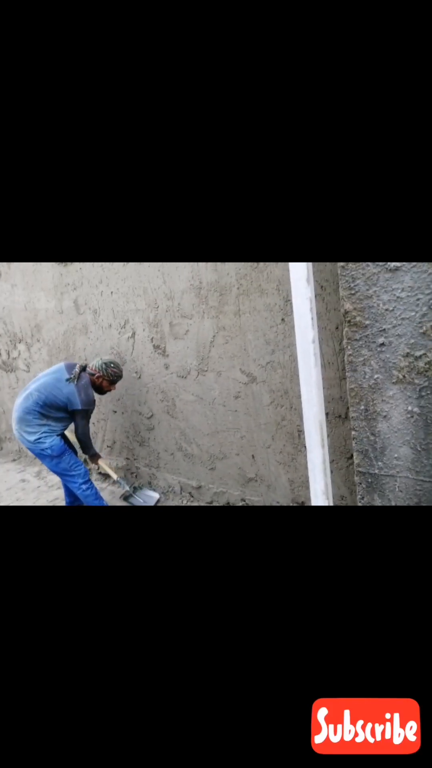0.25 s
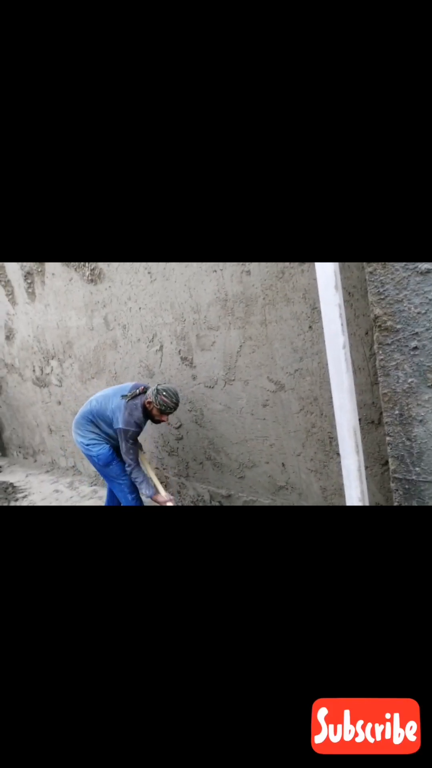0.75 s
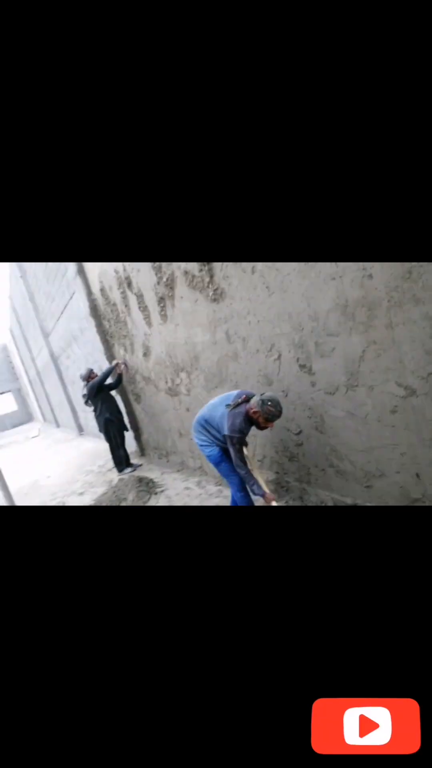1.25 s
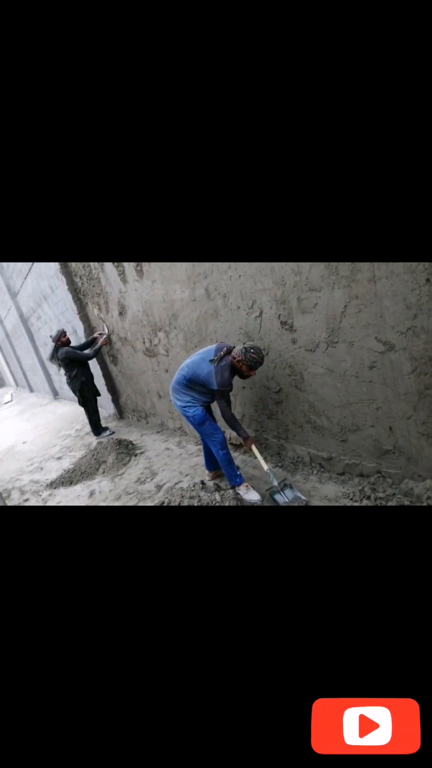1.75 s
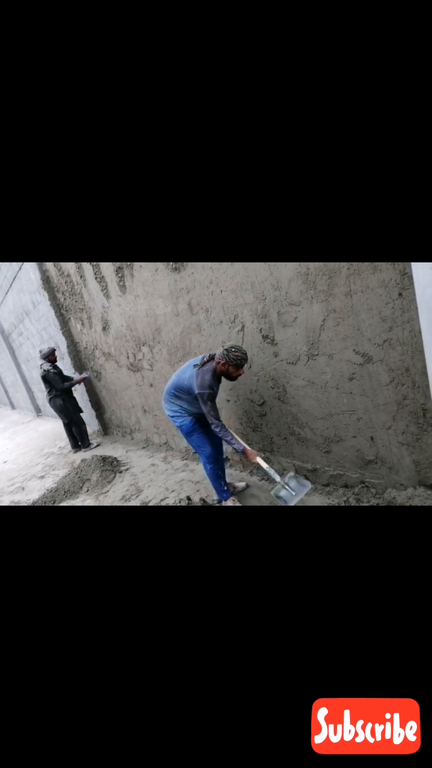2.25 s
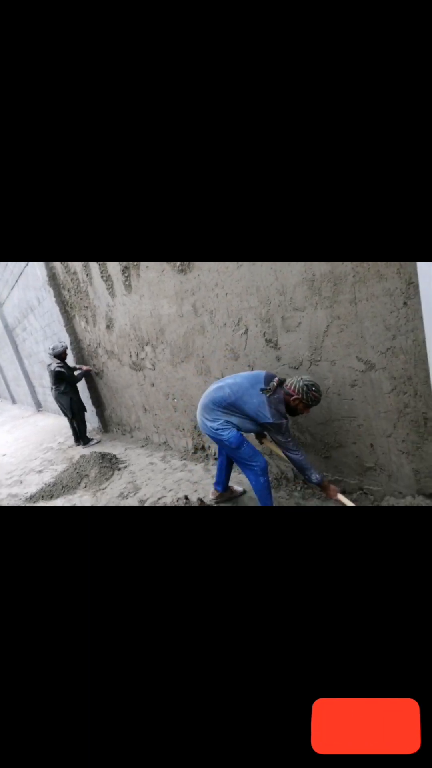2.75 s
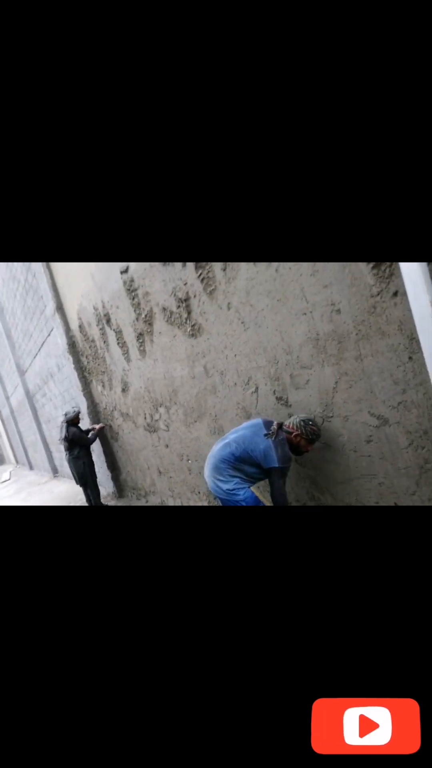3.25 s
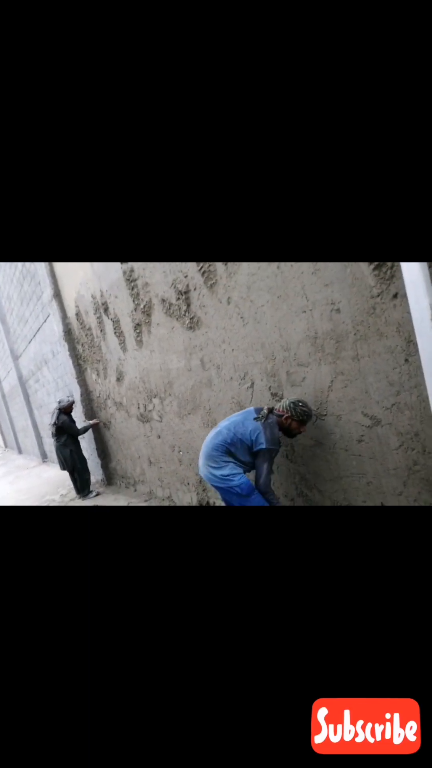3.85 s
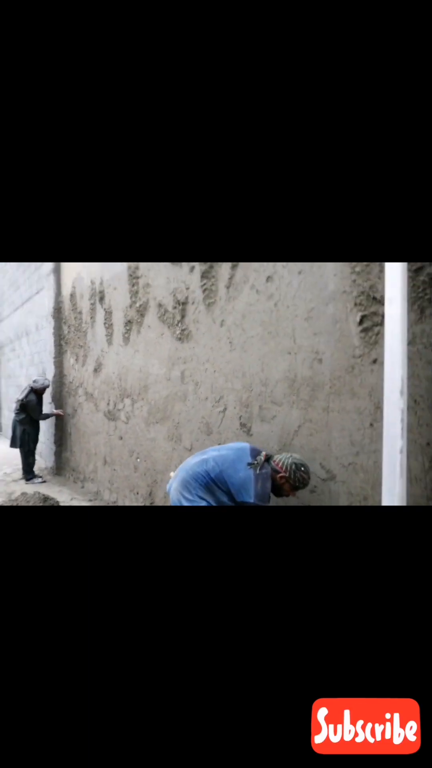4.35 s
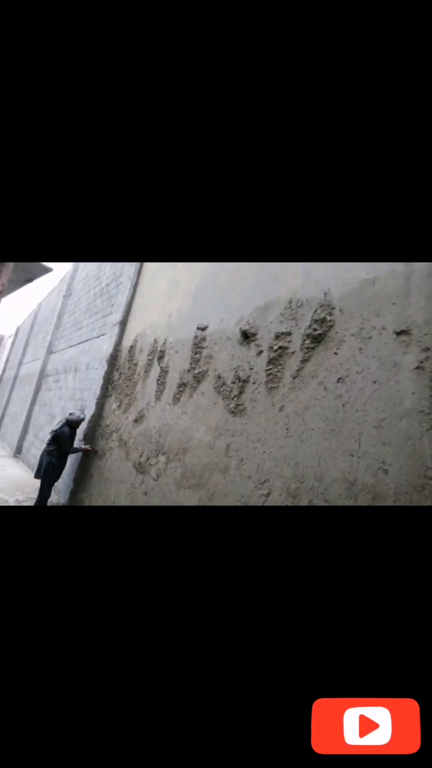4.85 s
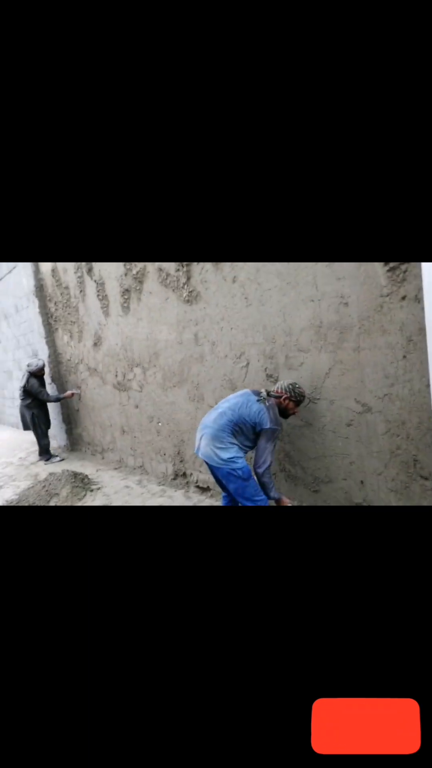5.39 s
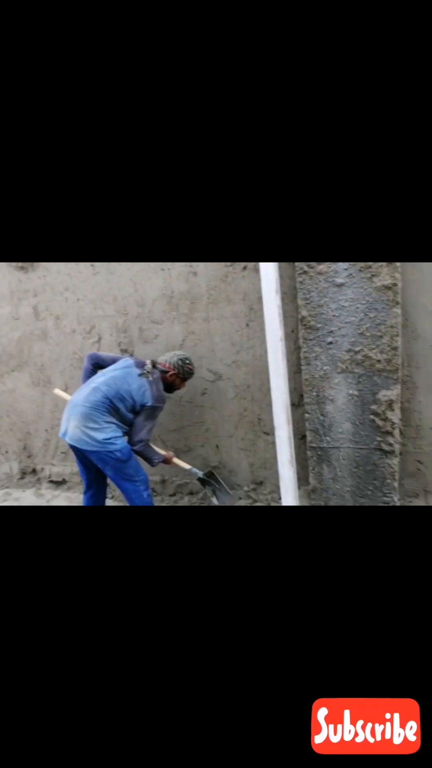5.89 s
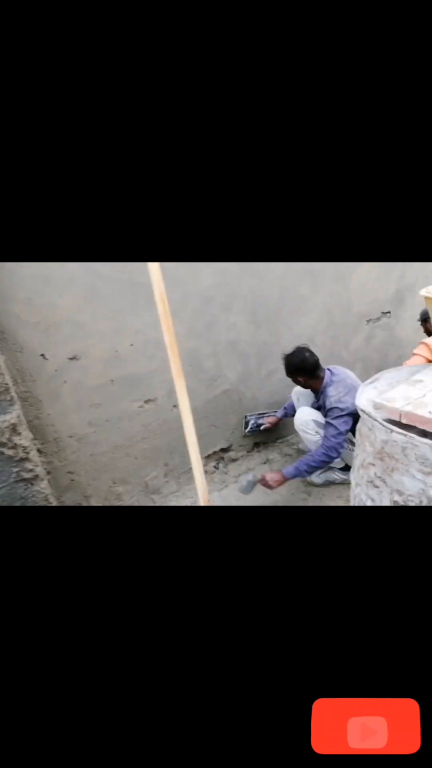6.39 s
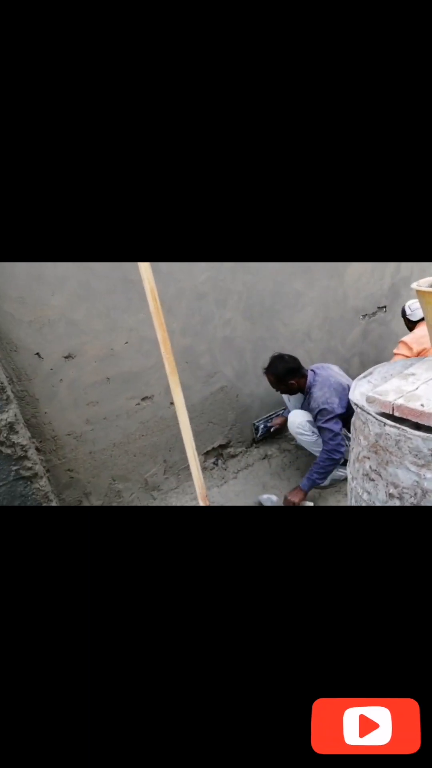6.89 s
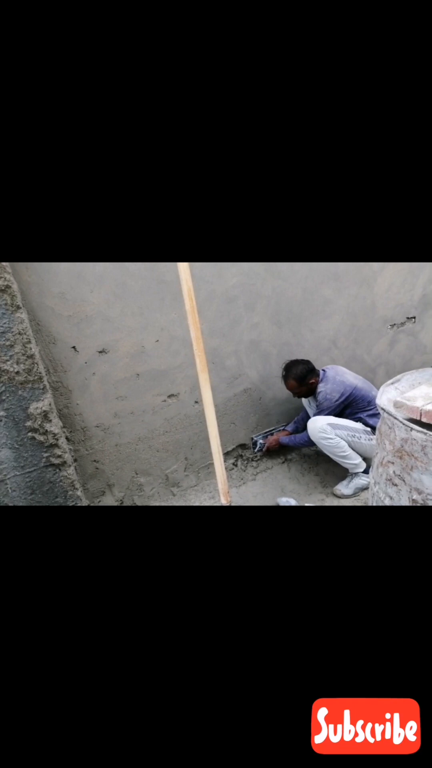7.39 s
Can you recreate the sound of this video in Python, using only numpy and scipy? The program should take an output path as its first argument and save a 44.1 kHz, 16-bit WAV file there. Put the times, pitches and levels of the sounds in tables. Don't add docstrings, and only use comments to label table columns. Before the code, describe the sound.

Outdoors beside a wall, a nearby steel shovel makes short, harsh, gritty scrapes, its plate ringing briefly as it catches lumps, with sand hissing under it. Low wind gusts buffet a hand-held phone's two ports separately, heaviest in the first three seconds, easing midway and returning near the end. Further off a float rubs wet plaster in patchy hisses.

```python
import sys
import numpy as np
from scipy import signal
from scipy.io import wavfile
from scipy.ndimage import uniform_filter1d

SR = 44100
rng = np.random.default_rng(int(sys.argv[2]) if len(sys.argv) > 2 else 0)


def wav_out(sig):
    wavfile.write(sys.argv[1], SR, np.round(np.clip(np.atleast_2d(sig).T, -1, 1) * 32767).astype(np.int16))


def to_linear_factor(level_db):
    exponent = np.asarray(level_db, float) / 20
    return 10 ** exponent


N = 336552


def rms(x):
    return np.sqrt(np.mean(x ** 2) + 1e-20)


def unit(x):
    return x / rms(x)


def power(levels_db):
    return np.sum(to_linear_factor(2 * levels_db), axis=0) + 1e-20


def in_time(rows):
    s, *columns = np.transpose(rows)
    return [np.interp(np.arange(N) / SR, s, c) for c in columns]


def spread_out(coarse):
    return np.interp(np.arange(N) / 32, np.arange(len(coarse)), coarse)


def band(x, low_hz, high_hz, order=2):
    sos = signal.butter(order, [low_hz, min(high_hz, .45 * SR)], "band", fs=SR, output="sos")
    return signal.sosfilt(sos, x)


def drift(rate_hz):
    r = np.exp(-64 * np.pi * rate_hz / SR)
    noise = rng.standard_normal(N // 32 + 3002)
    return unit(signal.lfilter([1], [1, -2 * r, r * r], noise)[3000:])


def grains(per_s, spread_db):
    sizes = to_linear_factor(spread_db * np.minimum(rng.exponential(1, N), 5)) * rng.choice([-1, 1], N)
    return unit(sizes * (rng.random(N) < per_s / SR) + 1e-9)


def ring(x, hz, t60_s):
    r = to_linear_factor(-60 / (t60_s * SR))
    w = 2 * np.pi * hz / SR
    return signal.lfilter([0, np.sin(w)], [1, -2 * r * np.cos(w), r * r], x + 1e-18)


def swell(start_s, hold_s, rise, fall, gained_db=0):
    t = np.arange(N // 32 + 2) * 32 / SR - np.asarray(start_s)[:, None]
    hold_s, rise, fall, gained_db = (np.reshape(v, (-1, 1)) for v in (hold_s, rise, fall, gained_db))
    rising_db = np.minimum(t, 0) / np.maximum(rise, 1e-5)
    falling_db = np.maximum(t - hold_s, 0) / np.maximum(fall, 1e-5)
    return rising_db - falling_db + gained_db * np.clip(t / np.maximum(hold_s, 1e-5), 0, 1)


def evened(x, span_s, share):
    slow = uniform_filter1d(x ** 2, size=round(span_s * SR)) + 1e-3 * np.mean(x ** 2)
    return unit(x / slow ** (np.clip(share, 0, 1) / 2))


def site():
    common, own = rng.standard_normal(N), rng.standard_normal((2, N))
    level = spread_out(to_linear_factor(-62 + 0.5 * drift(26.0)))
    return level * unit(band(common + 1.53 * own, 260, 690, order=1))


def rumble():
    return to_linear_factor(-65) * unit(band(rng.standard_normal((2, N)), 16, 55))


# t/s, level/dB
BREEZE = [(0, -50), (.3, -48), (.5, -31.5), (1.04, -34), (1.1, -56), (1.4, -38.5), (1.53, -49), (1.9, -40),
          (2.6, -38), (2.7, -47), (3.3, -53), (3.9, -52.5), (4.45, -61.5), (4.9, -63), (5.1, -39),
          (5.9, -44.5), (6.4, -64.5), (6.82, -56.5)]
# start t/s, hold/s, level/dB, left minus right/dB
GUSTS = [(0.1, 0.14, -44, -7.5), (0.434, 0.03, -27, -12), (0.584, 0.1, -28, 4.5), (0.75, 0.052, -30, -7),
         (0.876, 0.055, -24, -5.5), (0.986, 0.05, -23.5, -7.5), (1.194, 0.13, -25, -8.5),
         (1.445, 0.0084, -28, 8.5), (1.588, 0.12, -33.5, 1.5), (1.686, 0.046, -31, -10.5),
         (2.004, 0.045, -25.5, 4.5), (2.103, 0.01, -28, 24), (2.262, 0.0082, -24.5, 10.5),
         (2.36, 0.025, -25, 11), (2.451, 0.01, -28.5, -11), (2.54, 0.052, -25.5, 16),
         (2.799, 0.074, -32, 2), (2.923, 0.099, -36, 7), (3.044, 0.039, -34.5, 20), (3.24, 0.012, -40, -10),
         (5.822, 0.063, -41, 3), (5.433, 0.028, -32, 20), (5.504, 0.04, -33, 18), (0.674, 0.031, -27, 2),
         (3.746, 0.079, -55, 3), (3.984, 0.021, -48.5, -2.5), (6.1, 0.15, -65, 0), (3.175, 0.058, -40.5, 1),
         (3.582, 0.018, -39, 6), (4.637, 0.059, -43, -4), (5.059, 0.018, -36.5, -30.5),
         (5.156, 0.046, -32.5, 14.5), (5.326, 0.014, -32.5, 13), (5.604, .1, -40.5, 10),
         (2.468, 0.12, -31.5, 8), (5.699, 0.058, -37.5, 23.5), (6.87, 0.025, -37.5, 1),
         (7.346, 0.013, -28.5, 2), (6.91, 0.049, -29.5, 8.5), (6.986, .22, -30.5, -5),
         (7.28, 0.13, -33.5, -17), (7.421, 0.072, -29, -4), (7.545, 0.092, -36.5, -2.5)]
GUST_RISE_S, GUST_FALL_S = 0.069, 0.07


def gust_levels():
    s, hold_s, level_db, pan_db = np.transpose(GUSTS)
    gusts = to_linear_factor(2 * (level_db[:, None] + swell(s, hold_s, GUST_RISE_S / 20, GUST_FALL_S / 20)))
    total = spread_out(gusts.sum(axis=0)) + to_linear_factor(2 * in_time(BREEZE)[0])
    return 10 * np.log10(total), spread_out(pan_db @ gusts) / total


def wind():
    level_db, pan_db = gust_levels()
    out = []
    for side in (1, -1):
        lumps_db = spread_out(0.91 * drift(12.7) + 2.22 * drift(33.7))
        gust_db = level_db + side * pan_db / 2 + 3.5 - np.abs(pan_db) / 5 + lumps_db
        calm_db = uniform_filter1d(gust_db, size=SR // 12)
        eddies = grains(110, spread_db=4.0)
        swirl = band(grains(500, spread_db=4.0) + 0.34 * eddies, 57.6, 146, order=1)
        swirl = band(swirl, 38.7, 214.4)
        sway = band(rng.standard_normal(N), 18.3, 70.4)
        flap = band(band(eddies, 90.0, 247), 47, 484)
        many = np.roll(eddies, SR) + np.roll(eddies, 2 * SR) + np.roll(eddies, -SR)
        roll = band(band(many, 143, 374), 100, 600)
        snap = band(band(eddies ** 3, 220, 680), 211, 830)
        edge = to_linear_factor(np.clip(1.1 * (gust_db + 25), -15, 4))
        bright = to_linear_factor(-12.5) * unit(flap) + to_linear_factor(-15) * unit(roll) + to_linear_factor(-25.0) * edge * unit(snap)
        burst = evened(swirl, 0.0458, share=0.64) + edge * bright
        out.append(to_linear_factor(gust_db - 3.0) * burst + to_linear_factor(calm_db - 6.5) * evened(sway, .06, share=0.5))
    membrane = .5 * np.tanh(np.array(out) / .5)
    return signal.sosfilt(signal.butter(3, 750, fs=SR, output="sos"), membrane)


# t/s, peak level/dB, left minus right in steps of 12 dB
SLAPS = [(0.572, -13, -1.5), (0.797, -19.5, -18), (0.985, -16.5, -13.0), (1.025, -12, 3),
         (1.144, -12, -17.5), (1.283, -12, -9.0), (1.314, -10.5, -13), (2.107, -9.5, 20), (2.266, -17, 33),
         (5.333, -24, 47), (7.241, -15.5, -9), (0.228, -26.5, -11), (0.742, -23, -5), (5.075, -38, -18),
         (5.16, -20, 11.5), (5.443, -21, 10.5), (.868, -12.5, -1.5), (1.225, -12, -9), (1.265, -16, -12),
         (1.329, -19, -12), (1.971, -17, 12), (3.085, -31, 20), (5.628, -28, 6), (5.42, -23.5, 15),
         (.64, -16, 1), (1.035, -14, 0.5), (2.001, -18, 10), (2.147, -19, 11.5), (2.541, -20.5, 14),
         (2.43, -30, -12), (.905, -18, -6), (7.255, -29, 0), (7.42, -23.5, -1.5), (7.46, -22.5, -3),
         (.808, -13.5, -9), (5.511, -20.5, 12), (6.915, -22, 28), (7.163, -17, -7), (2.552, -20, 3),
         (2.578, -19, 3), (2.59, -19, 3), (6.885, -26, 3), (6.96, -22, 3), (7.125, -23, 3),
         (7.18, -19.5, -3), (7.352, -21, -4), (3.24, -29, 6)]


def slaps():
    s, peak_db, pan_db = np.transpose(SLAPS)
    side_db = np.minimum([pan_db, -pan_db], 0) * 12.0
    kicks = np.zeros((2, N)) + 1e-18
    kicks[:, (s * SR).astype(int)] = to_linear_factor(peak_db + 37.5 + side_db) * rng.choice([-1, 1], len(s))
    return band(band(kicks, 64, 297), 47, 573)


# start t/s, length/s, centre f/Hz, width/Hz, level/dB
FAR_SLIDES = [(2.352, 0.014, 1130, 260, -48), (3.157, 0.047, 1050, 252, -57.5),
              (3.447, 0.049, 823, 150, -51), (4.013, 0.05, 586, 333, -52), (4.206, 0.013, 754, 121, -54),
              (4.942, 0.14, 1610, 400, -68), (5.195, 0.18, 1590, 342, -62), (5.39, 0.058, 4380, 300, -63),
              (5.752, 0.038, 840, 150, -62.5), (6.588, 0.061, 980, 400, -58),
              (2.125, 0.0036, 2960, 1316, -63), (6.559, 0.042, 340, 255, -43.5)]


def far_slides():
    out = np.zeros(N)
    for start_s, length_s, hz, width_hz, db in FAR_SLIDES:
        t = np.arange(round((length_s + 0.032) * SR)) / SR
        rise, fall = t / min(.012, length_s / 2), (length_s - t) / 0.0083 + 1
        envelope = np.clip(np.minimum(rise, fall), 0, 1)
        noise = unit(band(rng.standard_normal(SR // 2), hz - width_hz / 2, hz + width_hz / 2))
        out[round(start_s * SR):][:len(t)] += to_linear_factor(db) * envelope * noise[-len(t):]
    return out


# loudest t/s, rise per 20 dB/s, fall per 20 dB/s, rub level/dB, coarse above rub/dB
RUBBING = [(.25, 0.15, 0.5, -57.5, -13), (.7, 0.38, 0.22, -52, -16), (.8, 0.4, 0.17, -57.5, -6),
           (1.02, 0.15, 0.3, -53, -5), (1.3, 0.8, 0.9, -69.5, 4.5), (1.46, .04, 0, -61, -7),
           (2.08, 0.17, -0.1, -62, -2), (2.245, .15, 0.15, -62, 1.5), (2.359, -0.1, 0.5, -50, -13),
           (2.49, 0.07, 0.32, -48, -10.5), (2.88, 0.3, .5, -61, -2.5), (2.99, 0.6, 0.26, -59, -3.5),
           (3.19, -0.1, 0.17, -49, -8), (3.259, 0.04, 0.19, -43, -10), (3.54, 0.63, 0.23, -57, -2),
           (3.71, 0, 1.3, -60.5, -3), (3.8, 0.15, .3, -48, -15), (3.89, 0.24, 0.13, -48, -14),
           (4.035, 0.05, 0.4, -47.5, -7), (4.18, 0.25, 0.34, -46, -10), (4.35, 0.2, 0.37, -45, -14),
           (4.45, 0.25, .1, -40.5, -15), (4.6, 0.2, 0.43, -47, -5), (4.66, 0.24, .5, -49, -10),
           (4.78, -0.36, 0.2, -46, -20), (4.96, 0.06, .5, -48, -11.5), (5.09, 1.2, .5, -57, -7),
           (5.24, 0, 0.54, -55, -5), (5.39, 0, 0.7, -55, -7.5), (5.62, -0.03, 0.5, -53.5, -5),
           (5.95, 0.54, 1.9, -51, -12), (6.13, 0.44, -0.33, -50.5, -6.5), (6.52, .5, 0.6, -51, -10),
           (6.66, -0.24, 0.27, -45.5, -8.5), (6.737, 0.13, 0.13, -42, -6.5), (6.88, 0.5, 0.7, -51, -9.5),
           (7.14, -0.4, .5, -50.5, -5.5), (7.211, 0.24, -0.5, -49, -6), (7.342, 0.07, 0.12, -43.5, -8.5),
           (7.58, 0.4, 2, -52.5, -13)]
REST_DB, COARSE_REST_DB = -74, -75


def rub_levels():
    s, rise_s, fall_s, rub_db, coarse_db = np.transpose(RUBBING)
    passes_db = rub_db[:, None] + swell(s, 0 * s, rise_s / 20, fall_s / 20)
    levels_db = []
    for above_db, rest_db in ((0, REST_DB), (coarse_db, COARSE_REST_DB)):
        total = power(passes_db + np.reshape(above_db, (-1, 1))) + to_linear_factor(2 * rest_db)
        levels_db.append(spread_out(10 * np.log10(total)))
    return levels_db


def float_rub():
    rub_db, coarse_db = rub_levels()
    sand = [grains(20000, spread_db=0.5) * spread_out(to_linear_factor(2.0 * drift(23.0))) for _ in range(3)]
    rub = to_linear_factor(rub_db - 10.5) * unit(band(sand[0], 3360, 6530))
    coarse = to_linear_factor(coarse_db - 8.0) * unit(band(sand[1], 1360, 3070, order=3))
    fine = to_linear_factor(rub_db - 13.5) * unit(band(sand[2], 6900, 15600))
    return rub + coarse + fine


# t/s, peak level/dB, f/Hz
KNOCKS = [
    (6.019, -36, 783),
    (6.02, -43, 1974),
    (6.392, -27, 827),
    (6.574, -34, 1130),
    (6.61, -41.5, 1040),
    (7.041, -22, 774),
    (7.082, -40.5, 930),
    (4.486, -35, 876),
    (4.82, -41, 848),
]
KNOCK_T60_S, KNOCK_SETTLE_S = 0.07, 0.0017


def knocks():
    out = np.zeros(N)
    n = np.arange(SR // 4)
    settle = 1 - np.exp(-n / (KNOCK_SETTLE_S * SR))
    for s, db, hz in KNOCKS:
        click = to_linear_factor(db) * (n == 0)
        pair = ring(click, hz, KNOCK_T60_S) + 0.55 * ring(click, 0.97 * hz, KNOCK_T60_S)
        out[round(s * SR):][:SR // 4] += settle * pair
    return out


# start t/s, length/s, f/Hz, rms level/dB
SINGING = [(0.36, 0.124, 588, -46), (0.347, 0.084, 1398, -44.5), (0.355, 0.063, 4785, -48),
           (0.422, 0.051, 2024, -39), (0.416, 0.06, 5020, -61), (0.426, 0.04, 1388, -42),
           (0.336, 0.074, 2810, -50), (0.464, 0.014, 3380, -50), (0.485, 0.0066, 5110, -44),
           (1.111, 0.071, 870, -46.5), (1.162, 0.021, 1250, -46), (1.104, 0.102, 2954, -54.5),
           (1.106, 0.053, 2045, -47), (1.757, .07, 1100, -47.5), (1.786, 0.063, 2750, -45),
           (1.847, 0.034, 3380, -59), (1.867, 0.049, 540, -44), (1.87, 0.068, 989, -47.5),
           (1.857, 0.035, 5100, -61), (2.614, 0.04, 3140, -49), (2.635, .025, 2420, -46),
           (1.83, 0.023, 2600, -41), (2.68, 0.013, 1050, -39.5), (6.388, 0.024, 2450, -43.5),
           (2.63, 0.033, 4400, -46), (2.666, 0.038, 1030, -49), (3.316, 0.046, 4350, -53.5),
           (3.311, 0.042, 5090, -52), (3.34, 0.047, 2107, -51.5), (3.34, .05, 3300, -63),
           (4.477, 0.0065, 2610, -50), (3.438, 0.078, 2120, -64), (4.6, 0.045, 1400, -64),
           (0.422, 0.023, 2900, -41.5), (7.026, 0.025, 2410, -48), (4.783, .04, 2620, -50.5),
           (4.788, 0.03, 5080, -54.5), (6.291, 0.063, 998, -46.5), (6.305, 0.051, 2025, -45),
           (6.34, 0.071, 5110, -62), (6.375, 0.032, 2695, -46), (6.979, 0.054, 2787, -42),
           (7.017, 0.028, 1410, -41.5), (7.493, 0.035, 895, -41.5), (7.488, 0.018, 2810, -48),
           (7.484, .03, 3270, -56)]
SING_T60_S, SING_EDGE_S = 0.085, 0.01


def singing(sand):
    out = np.zeros(N)
    t = np.arange(SR // 4) / SR
    for start_s, length_s, hz, db in SINGING:
        i = round(start_s * SR)
        chatter = np.clip(np.minimum(t, length_s - t) / SING_EDGE_S + .5, 0, 1)
        tone = ring(sand[i:][:len(t)] * chatter[:N - i], hz, SING_T60_S)
        out[i:][:len(t)] += to_linear_factor(db) * tone / np.sqrt(SING_T60_S * SR / 28)
    return out


# f/Hz, level/dB, t60/s
BLADE = [(780, -8, .035), (1030, 0, .03), (1390, -1, .03), (1750, -2, .025), (2040, -2, .035),
         (2450, 0, .025), (2690, 2, .025), (3050, 0, .02), (3390, -2, .03), (3900, -3, .015),
         (4350, -5, .02), (5030, -2, .022), (5300, -2, .02), (5670, -4, .025)]


def blade(force):
    total = force
    for hz, db, t60_s in BLADE:
        feed = spread_out(to_linear_factor(db - 34.5 + 1.7 * drift(34)))
        total = total + ring(force * feed, hz, t60_s)
    return total


# start t/s, push/s, grind level/dB, gained over the push/dB, blade body above grind/dB
STROKES = [(0.334, 0.02, -38, 3, -7.5), (0.359, 0.062, -30, -2, -6), (0.431, 0.055, -28.5, -1.5, -7),
           (0.501, 0.095, -36.5, -8.5, -6), (1.094, 0.014, -33, 0.5, -4.5),
           (1.118, 0.056, -31.5, 0.5, -4.5), (1.73, 0.045, -33.5, 1.5, -9.5), (1.78, 0.12, -30.5, 1, -8.5),
           (1.912, 0.045, -33.5, -7.5, -4), (2.699, .085, -38.5, -9.5, 0), (6.425, 0.052, -37, -8, -2.5),
           (1.17, 0.032, -39.5, 2, -5), (2.604, 0.012, -35.5, -2, -1.5), (2.628, 0.061, -30.5, -3, -8.5),
           (3.317, 0.051, -30, 3, -7), (3.378, 0.034, -38, -4, -3), (4.085, 0.017, -39, 3.5, -1.5),
           (4.452, 0.02, -34, -0.5, -8.5), (4.801, 0.01, -33, -3, -9), (6.019, 0.016, -41, -8.5, 5.5),
           (6.295, 0.12, -35, 3.5, -6), (6.575, 0.0065, -46, -4, 8), (6.978, 0.069, -39.5, 5, -4.5),
           (7.488, 0.021, -31.5, -7.5, 1.5)]
BITE_S, BITE_SHARE = 0.006, 0.07
LET_GO_S, LET_GO_SHARE = 0.1, 0.31
LIFT_DB, LIFT_S = 10, 0.007
BODY_LINGERS, SAND_LINGERS = 2.08, 0.57
SAND_DB, SAND_LATE_S, SAND_PILES_DB = -10.5, 0.005, 2.5


def stroke_levels():
    s, push_s, grind_db, gained_db, body_db = np.transpose(STROKES)
    bite = (BITE_S + BITE_SHARE * push_s) / 30
    fall = (LET_GO_S + LET_GO_SHARE * push_s) / 30
    lift_db = np.maximum(swell(s, push_s, np.inf, LIFT_S / LIFT_DB), -LIFT_DB)
    layers = ((0, 0, 1, 0), (body_db, 0, BODY_LINGERS, 0), (SAND_DB, SAND_LATE_S, SAND_LINGERS, SAND_PILES_DB))
    levels = []
    for above_db, late_s, linger, piled_db in layers:
        shape_db = swell(s + late_s, push_s - late_s, bite + late_s / 30, fall * linger, gained_db + piled_db)
        stroke_db = (grind_db + above_db)[:, None] + lift_db + shape_db
        levels.append(spread_out(np.sqrt(power(stroke_db))))
    return levels


# t/s, peak level/dB, plate knock above peak/dB, floor thud above peak/dB
CATCHES = [(0.3583, -15, -3, -23), (.342, -33, -17, -30), (0.383, -14, -6, -34), (0.474, -10.5, -15, -32),
           (2.129, -38, -3, -20), (2.36, -36, -20, -30), (6.404, -14, -6, -19), (6.437, -25, -18, -16),
           (2.654, -20, -20, -15), (1.793, -15.5, -25, -15), (3.261, -25.5, -13, -18),
           (3.29, -31, -15, -22), (4.377, -48, -33, -23.5), (7.079, -35, 10, -10), (7.243, -33, 2.5, -7),
           (1.898, -33, -2, 7), (0.431, -12.5, -3, -34), (1.099, -10, -6, -30), (1.1537, -19, -2, -24),
           (1.45, -35, -12.5, -11), (1.73, -32, -29, -11), (1.781, -16, -36, -3.5), (1.8005, -7, -32, -10),
           (1.831, -13.5, -32, -9), (1.8695, -11.5, 4, -9.5), (2.596, -9, -7, -6.5),
           (2.6389, -8.5, -32, -12), (2.665, -13.5, -27, -9), (2.681, -19, 6, -8),
           (3.3049, -12.5, -54, -15), (3.329, -14.5, -44, -6), (3.365, -12, -30.5, -5),
           (3.354, -15, -15, -12), (4.095, -17, -10, -2.5), (4.351, -31, -30, -33), (4.4644, -22, -2, -0.5),
           (4.484, -12, -12, -6.5), (4.7934, -21, -39, -16), (4.817, -21, -0.5, -9.5),
           (6.2975, -31, 17, -16.5), (6.343, -16.5, -2, -16), (6.391, -11, 3, -14), (6.999, -22.5, 9, -1.5),
           (7.0254, -13, -4, -14), (7.042, -13.5, 4.5, -19), (7.013, -19.5, 5.5, -15), (7.505, -22, 0, -15),
           (0.492, -15, -20, -20), (7.4902, -14, 4, -12)]


def shovel():
    grind, body, hiss = stroke_levels()
    clumps = spread_out(to_linear_factor(1.06 * drift(71) + 1.24 * drift(126)))
    sand = clumps * grains(14000, spread_db=2.6)
    s, peak_db, knock_db, thud_db = np.transpose(CATCHES)
    hits = np.zeros((3, N)) + 1e-18
    hits[:, (s * SR).astype(int)] = to_linear_factor([peak_db, peak_db + knock_db, peak_db + thud_db])
    rise, fall = to_linear_factor(-60 / (0.0056 * SR)), to_linear_factor(-60 / (0.036 * SR))
    sharp, dull, deep = signal.lfilter([1 - rise], np.convolve([1, -rise], [1, -fall]), hits)
    edge_force = sand * (to_linear_factor(-3.5) * grind + to_linear_factor(-15.5) * sharp)
    body_force = sand * to_linear_factor(2.0) * body + to_linear_factor(-12) * dull * rng.standard_normal(N)
    high, low = blade(np.array([edge_force, body_force]))
    plate = band(high, 1790, 5530) + band(low, 640, 1807)
    middle = to_linear_factor(-14) * band(low + 0.43 * high, 1270, 2200)
    fine = band(sand * (to_linear_factor(-1.0) * hiss + to_linear_factor(-20) * sharp), 4000, 12340)
    thud = to_linear_factor(8) * band(deep * rng.standard_normal(N), 253, 436)
    return plate + middle + fine + thud + singing(sand)


def port(x, peaks):
    for hz, width_hz, gain_db in peaks:
        w, a = 2 * np.pi * hz / SR, to_linear_factor(gain_db / 2)
        q = np.sin(w) * width_hz / hz / 2
        middle = -2 * np.cos(w)
        x = signal.lfilter([1 + q * a, middle, 1 - q * a], [1 + q / a, middle, 1 - q / a], x)
    return x


# f/Hz, width/Hz, level/dB
LEFT_PORT = [(2796, 2560, 10), (3910, 710, -5.5), (5426, 2220, 12), (10200, 5000, -4.5),
             (15880, 1600, 29.5)]
RIGHT_PORT = [(2660, 270, 1.5), (3860, 3000, -6), (5470, 720, -1), (7170, 230, 5.5), (9370, 3550, 12),
              (14700, 10400, -3)]


def heard(x, lag_ms, scatter_db, tail_s):
    n, out = np.arange(N), []
    bright = band(x, 400, 11300, order=1)
    for side, peaks in ((0.67, LEFT_PORT), (-1.18, RIGHT_PORT)):
        shift = np.round(side * lag_ms * SR / 2000).astype(int)
        total = x[np.clip(n - shift, 0, N - 1)]
        delays_s = tail_s * rng.uniform(.03, 1, 10) ** 2 + .001
        gains = to_linear_factor(-25 * delays_s / tail_s) * rng.choice([-1, 1], 10)
        gains = to_linear_factor(scatter_db) * gains / np.sqrt(np.sum(gains ** 2))
        for delay_s, gain in zip(delays_s, gains):
            path = spread_out(delay_s + .0007 * drift(9)) * SR
            total = total + gain * bright[np.clip(n - path.astype(int), 0, N - 1)]
        out.append(port(total, peaks))
    return np.array(out)


# t/s, left lags right/ms, right port shade level/dB
SHOVEL_LAG = [
    (0, 0.049, -3),
    (3.6, 0.032, 5),
    (5.9, 0.32, -10),
    (6.2, 0.42, -8),
    (7.63, 0.31, -2),
]
FLOAT_LAG_MS = -0.377


def scene():
    lag_ms, shade_db = in_time(SHOVEL_LAG)
    far = heard(float_rub() + far_slides(), FLOAT_LAG_MS, scatter_db=3.0, tail_s=0.055)
    near = heard(shovel() + knocks(), lag_ms, scatter_db=2.5, tail_s=0.042)
    near[1] += (to_linear_factor(shade_db) - 1) * band(near[1], 550, 3600, order=1)
    return site() + rumble() + wind() + slaps() + far + near


def top_cut(x):
    return signal.sosfilt(signal.butter(12, 15850, fs=SR, output="sos"), x)


def record(dry):
    cut = signal.sosfilt(signal.cheby2(12, 60, 16300, fs=SR, output="sos"), dry)
    return top_cut(cut)


dry = scene()
out = record(dry)
wav_out(out)
```